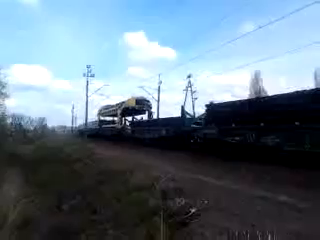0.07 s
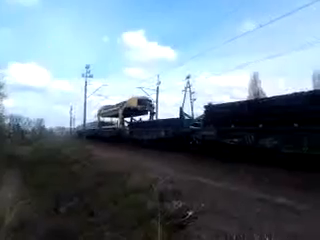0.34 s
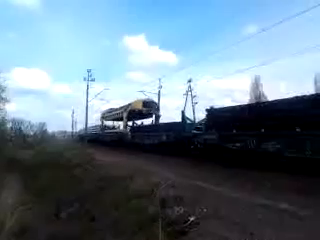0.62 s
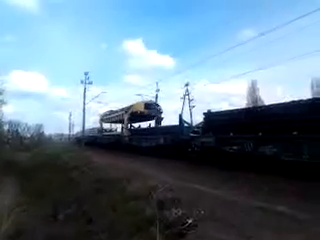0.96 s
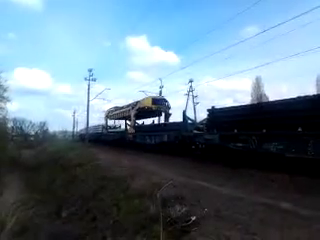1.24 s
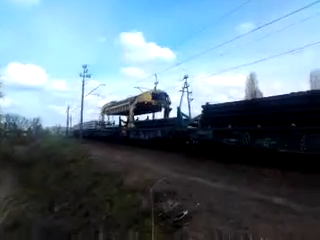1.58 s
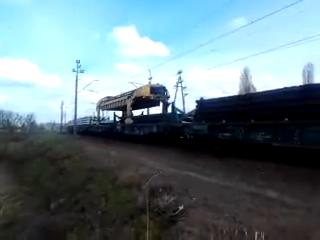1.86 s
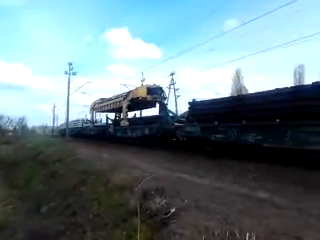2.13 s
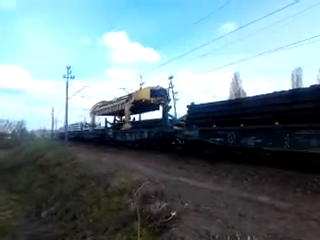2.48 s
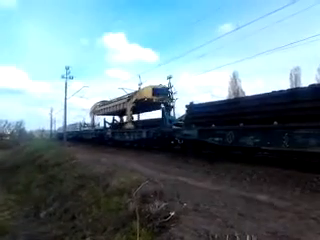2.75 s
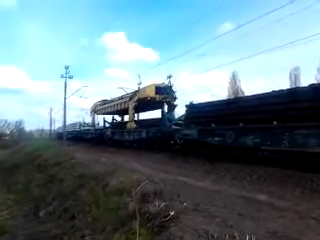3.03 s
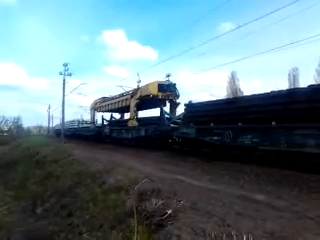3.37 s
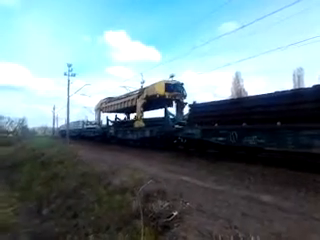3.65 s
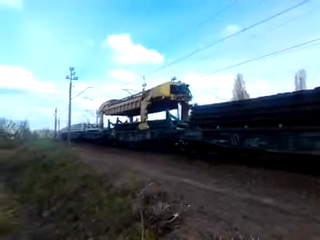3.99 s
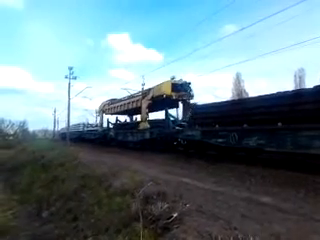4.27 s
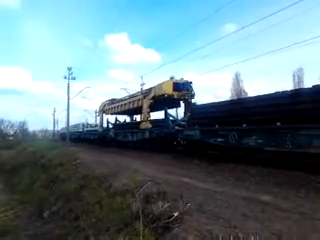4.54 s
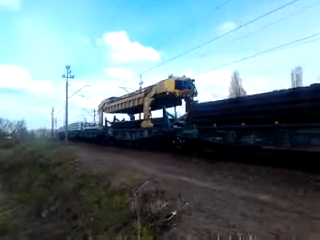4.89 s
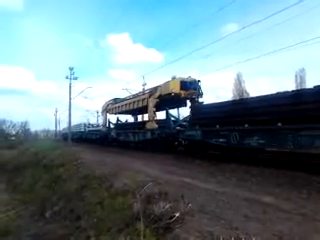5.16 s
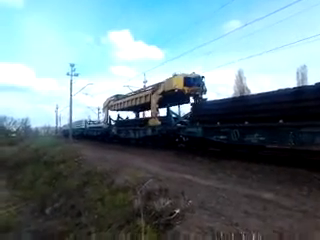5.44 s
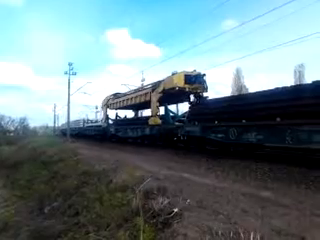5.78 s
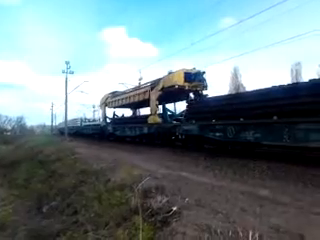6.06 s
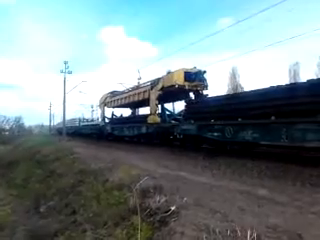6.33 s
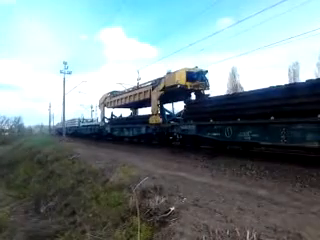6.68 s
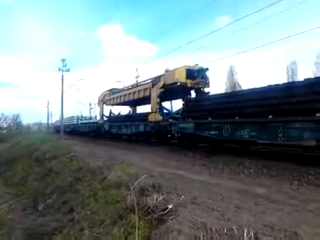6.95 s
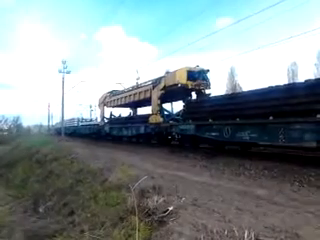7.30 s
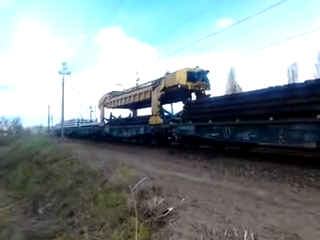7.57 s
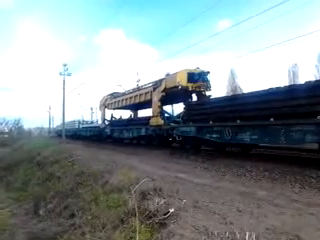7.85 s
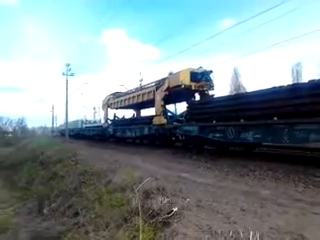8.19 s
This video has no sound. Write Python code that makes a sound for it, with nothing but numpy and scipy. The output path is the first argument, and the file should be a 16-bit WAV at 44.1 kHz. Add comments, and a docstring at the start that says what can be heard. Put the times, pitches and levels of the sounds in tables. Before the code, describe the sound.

After silence, the sound cuts in abruptly at about 0.7 seconds: a track-laying machine working on flat wagons, heard from one microphone beside the line. Its diesel engine drones low and clatters steadily, with wagon rumble, hiss and a wavering hydraulic whine. A knock at the opening leads into a loud, briefly ringing steel clank at 0.9 seconds. From about 1.6 to 3.4 seconds a rough motor whine sinks in pitch. Between 3 and 5 seconds the machine rolls a little closer, growing brighter, with gentle surges of hiss. A gust thumps and buffets the microphone from about 4 to 5 seconds. Soft steel bumps come at 4.8 and 5.7 seconds, then a second loud, sharper clank at 6.7 seconds. The engine and pump run on until the end, at around 8 seconds.

```python
"""Track-laying gantry at the lineside

One microphone beside the line; the gantry works on a train of flat wagons and rolls closer midway.
Its six-cylinder diesel drones and clatters under a whining hydraulic pump, and a motor runs down.
Steel clanks twice, loudly, and bumps softly in between, ringing a wagon. Halfway through, a gust
thumps on the microphone. The sound cuts in abruptly out of silence."""
import sys
import numpy as np
from scipy.fft import rfft, irfft, next_fast_len
from scipy.io import wavfile
from scipy.ndimage import map_coordinates

SR = 44100
rng = np.random.default_rng(int(sys.argv[2]) if len(sys.argv) > 2 else 0)


def transcribe(u):
    """Save the signal u as a 16-bit wav file named by the first command-line argument.

    u: samples, shape (n,) or (channels, n), limited to [-1, 1]; the rate is SR.
    q: integer samples, one column per channel.
    """
    v = np.clip(np.atleast_2d(u).T, -1, 1)
    q = np.round(v * 32767).astype(np.int16)
    wavfile.write(sys.argv[1], SR, q)


N = 362502
TIME = np.arange(N) / SR
START_S, TOP_HZ = 0.687, 14500
CYLINDERS = 6


def amp(db):
    """Decibels to gain."""
    return 10 ** (np.asarray(db) / 20)


def unit(x):
    """Scale to rms 1."""
    return x / np.sqrt(np.mean(x ** 2) + 1e-20)


def curves(rows):
    """One value per sample for each column after the time."""
    times, *columns = np.transpose(rows)
    return [np.interp(TIME, times, column) for column in columns]


def swells(rows, height):
    """A sum of bell-shaped swells, each peaking at height(its dB)."""
    return sum(height(db) * np.exp(-((TIME - at) / half) ** 2) for at, db, half in rows)


def wobble(rate):
    """A smooth random curve, rate knots a second."""
    return map_coordinates(rng.standard_normal(int(N * rate / SR) + 4), [TIME * rate])


def noise():
    """Fresh white noise."""
    return rng.standard_normal(N)


def filtered(x, response):
    """x times a response of frequency."""
    size = next_fast_len(N + 8192)
    return irfft(rfft(x, size) * response(np.fft.rfftfreq(size, 1 / SR)), size)[:N]


def coloured(x, spectrum, tilt_db=0):
    """x shaped by (f/Hz, level/dB) points and a tilt per octave, at rms 1."""
    points_hz, db = np.transpose(spectrum)

    def response(hz):
        shape_db = np.interp(np.log(hz + 1), np.log(points_hz), db, left=-80, right=-80)
        return amp(shape_db + tilt_db * np.log2(hz + 1))
    return unit(filtered(x, response))


def turns(hz):
    """Cycles completed at a changing rate."""
    return np.cumsum(hz) / SR


def tone(cycles, waver_db, smear_rad):
    """A sine of rms near 1 whose level and phase waver in the moving air."""
    phase = 2 * np.pi * (cycles + rng.random()) + smear_rad * wobble(12)
    return np.sqrt(2) * np.sin(phase) * amp(waver_db * wobble(6))


def closing(far, near):
    """Moves from far to near as the gantry rolls up to the microphone, from 2.8 to 5.2 s."""
    return far + (near - far) * np.clip((TIME - 2.8) / 2.4, 0, 1)


def approaching(x, spectra):
    """x shaded from its far colour to its near one."""
    hz, far_db, near_db = np.transpose(spectra)
    return closing(coloured(x, np.c_[hz, far_db]), coloured(x, np.c_[hz, near_db]))


def harmonics(cycles, rows, waver_db, smear_rad):
    """Wavering harmonics, each moving from its far level to its near one."""
    return sum(amp(closing(far_db, near_db)) * tone(round(multiple) * cycles, waver_db, smear_rad)
               for multiple, far_db, near_db in rows)


# Diesel speed: t/s, firing rate f/Hz
ENGINE_SPEED = [(0.7, 108.9), (1.42, 109.4), (1.7, 112.6), (2.15, 110.1), (3.1, 109.0), (4.4, 107.5),
                (5.4, 108.3), (7.4, 108.0), (7.82, 106.0), (8.2, 108.9)]
def engine_cycles():
    """Cycles the diesel has completed; every cylinder fires once in each."""
    firing_hz, = curves(ENGINE_SPEED)
    return turns(firing_hz / CYLINDERS)


# Exhaust drone: t/s, firing tone level/dB, octave level/dB
EXHAUST_LEVELS = [(0.8, -32.5, -40), (1.6, -32.5, -40.1), (1.95, -37, -38.5), (3.75, -30, -45.5),
                  (5.25, -29.5, -42.5), (5.6, -28, -35), (6.7, -32.2, -36.5), (7.45, -31.3, -38),
                  (7.9, -29, -34)]
# Tones of unequal cylinders: multiple of the cycle rate, far level/dB, near level/dB
UNEVEN_TONES = [(5, -56, -49), (7, -56, -52), (9, -44.5, -44), (13, -52, -56), (14, -48, -52),
                (22, -50, -51), (30, -52, -49), (31, -48, -41.5), (33, -52, -51), (36, -51, -47.5)]
def exhaust(cycle):
    """Exhaust pulses drone at the firing rate and its octave; unequal cylinders add weaker tones."""
    firing_db, octave_db = curves(EXHAUST_LEVELS)
    drone = amp(firing_db) * tone(CYLINDERS * cycle, waver_db=1.0, smear_rad=0.042)
    drone += amp(octave_db) * tone(2 * CYLINDERS * cycle, waver_db=0.0, smear_rad=0.083)
    return drone + harmonics(cycle, UNEVEN_TONES, waver_db=1.8, smear_rad=0.094)


def rattle(cycle, repeat, depth):
    """Engine noise pulsing at each firing; the share `repeat` of its power recurs every cycle."""
    size = SR // 18  # samples in about one cycle
    pattern = unit(map_coordinates(rng.standard_normal(size), [cycle % 1 * size], mode="grid-wrap"))
    pulsing = 1 + depth * np.cos(2 * np.pi * CYLINDERS * cycle)
    return pulsing * (np.sqrt(repeat) * pattern + np.sqrt(1 - repeat) * noise())


# Spectra of wagon rumble, air and oil hiss, and the fizz on top: f/Hz, relative level/dB
RUMBLE_SPECTRUM = [(15, -23), (40, -2.5), (70, 1), (150, -1), (220, 0), (300, -7.5), (450, -27)]
HISS_SPECTRUM = [(1800, -34), (2900, -13), (3500, -4.5), (4300, -1.5), (5100, 3.5), (5800, -2), (6300, -9),
                 (7100, -2.5), (7900, -5.5), (8500, -15.5), (10000, -40)]
FIZZ_SPECTRUM = [(8400, -16), (9100, 2.5), (9700, -0.5), (10700, -7.5), (12200, 2.5), (13400, -3),
                 (14500, -13)]
# Spectra of housing roar and injector clatter: f/Hz, relative level/dB far, the same near
ROAR_SPECTRA = [(200, -13, -34), (306, -0.5, -3), (380, -2.5, -3), (450, 1, 3), (545, 2.5, 1),
                (685, -3, -6), (837, -4.5, 0), (985, 0.5, 5.5), (1097, 0.5, 1), (1194, -3, 0),
                (1490, -8, -11.5), (2250, -40, -21)]
CLATTER_SPECTRA = [(704, -5.5, -27), (1200, 2.5, -8.5), (1430, -2.5, 3), (1750, 2, -1), (1940, -0.5, 7.5),
                   (1970, 2, 2.5), (2210, 0, -1), (2360, -0.5, 2.5), (2630, -3.5, -6.5), (2830, -8.5, -14),
                   (4020, -24.5, -32)]
# Surges of air and oil: t/s, rise in hiss level/dB, half length/s
SURGE_SWELLS = [(2.85, 4, .38), (3.55, 1.5, 0.12), (4.5, 2, 0.34), (5.55, 2, 0.19), (6.9, 0.5, 0.26),
                (7.83, 2.5, 0.21)]
def machinery(cycle):
    """Wagons rumble, the housing roars, injectors clatter, air and oil hiss; surges lift the treble."""
    surge_db = swells(SURGE_SWELLS, float)
    opening_db = 5.5 * np.exp(-np.maximum(TIME - START_S, 0) / 0.78)  # starts louder, then settles
    rumble_db = closing(-38, -35.7) + 1.2 * opening_db + wobble(6.5)
    roar_db = closing(-29.5, -28.5) + opening_db + 0.55 * wobble(9)
    clatter_db = closing(-33, -30.5) + 0.77 * opening_db + 0.28 * surge_db + 0.48 * wobble(11)
    hiss_db = closing(-41, -37) + 0.5 * opening_db + surge_db + 0.58 * wobble(5.1)
    fizz_db = closing(-53.5, -48) + 1.6 * surge_db + wobble(30)
    return (amp(rumble_db) * coloured(noise(), RUMBLE_SPECTRUM)
            + amp(roar_db) * approaching(rattle(cycle, repeat=0.19, depth=0.067), ROAR_SPECTRA)
            + amp(clatter_db) * approaching(rattle(cycle, repeat=0.39, depth=0.093), CLATTER_SPECTRA)
            + amp(hiss_db) * coloured(rattle(cycle, repeat=0.16, depth=0.04), HISS_SPECTRUM)
            + amp(fizz_db) * coloured(noise(), FIZZ_SPECTRUM))


# Hydraulic whine: t/s, level/dB
WHINE_LEVELS = [(1.2, -35.6), (1.7, -29), (2.2, -34), (2.75, -28.4), (3.55, -34.5), (4.3, -38),
                (4.95, -34.3), (5.85, -39), (6.35, -32.2), (8.1, -33.5)]
# Harmonics that ring the housing, relative to the whine: multiple, far level/dB, near level/dB
HOUSING_TONES = [(12, -7, -4.2), (13, -4.8, -3.8), (14, -4.5, -10)]
# Weaker pump harmonics: multiple, far level/dB, near level/dB
WEAK_PUMP_TONES = [(6, -48.5, -48), (8, -45, -49.5), (15, -53, -57), (18, -54, -47.5), (24, -48, -48),
                   (30, -56, -49.5)]
def pump(cycle):
    """Piston harmonics geared to the engine; three ring the housing near 1 kHz, rougher close up."""
    whine_db, = curves(WHINE_LEVELS)
    strokes = 0.75 * CYLINDERS * cycle  # three strokes to four firings
    ringing = harmonics(strokes, HOUSING_TONES, waver_db=1.6, smear_rad=closing(0.24, 0.52))
    weak = harmonics(strokes, WEAK_PUMP_TONES, waver_db=3.5, smear_rad=0.71)
    return amp(whine_db) * ringing + weak


def blow(age, rise_s, t60_s):
    """A blow's envelope: exponential rise to age 0, then 60 dB down in t60_s."""
    return np.exp(np.minimum(age, 0) / max(rise_s, 0.001)) * amp(-60 * np.maximum(age, 0) / t60_s)


# Wagon resonances: f/Hz, width/Hz, relative level/dB
WAGON_MODES = [(204, 42, -9), (586, 79, 1.5), (750, 92, 4), (1113, 32, 3), (1710, 71, -2), (1970, 25, -10),
               (2410, 32, -22)]
def wagon_ring(hz):
    """The frequency response of the wagon's ringing steel."""
    return sum(amp(db) * 1j * hz * width / (centre ** 2 - hz ** 2 + 1j * hz * width)
               for centre, width, db in WAGON_MODES)


# Steel blows: t/s, body relative level/dB, rise/s, t60/s, tilt/(dB per octave), crack level/dB
STEEL_BLOWS = [(0.69, -18, 0.0014, 0.39, -2, -31.5), (.915, -12.8, 0.0051, 0.33, -2, -31),
               (0.939, -14.5, 0.0073, 0.46, -0.4, -32), (4.77, -25.5, 0.029, 0.33, -0.5, -47),
               (5.695, -24, .02, 0.33, -1.5, -51), (6.678, -16.5, 0.012, 0.26, 2, -21)]
# Spectra of the struck wagon and of the crack: f/Hz, relative level/dB
WAGON_SPECTRUM = [(60, -31), (180, 0), (350, -3), (520, 0), (800, -5.5), (1100, -1.5), (1600, -4.5),
                  (2300, -3.5), (3200, -16), (4300, -16.5), (5500, -11), (7500, -22), (9000, -29.5),
                  (14000, -41)]
CRACK_SPECTRUM = [(1200, -16), (2500, 1), (4200, -0.5), (6000, -4), (7500, 8), (8200, -4), (9000, -7),
                  (10300, -11), (11500, -17), (14000, -16)]
def clanks():
    """Heavy steel meets steel: a bright crack, then a crowd of small contacts that ring the wagon."""
    body, crack_envelope = np.zeros(N), np.zeros(N)
    for at, db, rise_s, t60_s, tilt_db, crack_db in STEEL_BLOWS:
        age = TIME - at
        contacts = noise() * amp(0.65 * wobble(500))
        body += amp(db) * blow(age, rise_s, t60_s) * coloured(contacts, WAGON_SPECTRUM, tilt_db)
        crack_envelope += amp(crack_db) * blow(age + rise_s, 0.0033, 0.071)  # peaks as the body swells
    crack = crack_envelope * coloured(noise(), CRACK_SPECTRUM)
    return amp(-1.0) * body + amp(-0.5) * filtered(body, wagon_ring) + crack


# Motor partials: multiple of the pitch, level/dB
MOTOR_TONES = [(.25, -41), (1, -36.3), (1.45, -42)]
def motor_rundown(start_s=1.6, end_s=3.42, fade_s=0.3, start_hz=840, sag_hz_per_s=234):
    """A rough whine that sinks steadily as a motor slows."""
    age = np.clip(TIME, start_s, end_s) - start_s
    envelope = np.clip(np.minimum(age, end_s - start_s - age) / fade_s, 0, 1)
    cycles = turns(start_hz - sag_hz_per_s * age + 18 * wobble(90))
    return envelope * sum(amp(db) * tone(multiple * cycles, waver_db=2.5, smear_rad=0.4)
                          for multiple, db in MOTOR_TONES)


# Buffeting at the microphone: f/Hz, relative level/dB
BUFFET_SPECTRUM = [(18, -14), (45, 1), (110, -1), (240, -3), (400, -13.5), (700, -33), (1500, -60)]
# Gusts and single eddies: t/s, peak level/dB, half length/s
GUST_SWELLS = [(1.75, -28, .04), (4.16, -25, .025), (4.3, -19.5, 0.062), (4.45, -27, 0.063),
               (4.65, -21.5, 0.037), (4.77, -30, .035), (4.86, -27.5, .03), (4.96, -27.5, .025),
               (5.28, -32, 0.15), (6.25, -32, .05)]
EDDY_PULSES = [(4.087, -11, 0.00073), (4.093, -13.5, .0013), (4.307, -12, 0.00074), (4.317, -7, 0.0019),
               (4.405, -11.5, 0.00069), (4.476, -13, .002), (4.661, -17, 0.0026), (4.855, -16, 0.0014),
               (4.966, -17, 0.0017)]
def wind(breeze_db=-50):
    """Gusts over a light breeze buffet the microphone; a few eddies each pull once at the diaphragm."""
    buffeting = unit(amp(2.9 * wobble(35)) * coloured(noise(), BUFFET_SPECTRUM))
    pressure = (amp(breeze_db) + swells(GUST_SWELLS, amp)) * buffeting
    for at, db, half in EDDY_PULSES:
        offset = (TIME - at) / half
        pressure -= amp(db) * (1 - offset ** 2) * np.exp(-offset ** 2 / 2)
    return pressure


def scene():
    """Everything that reaches the one microphone beside the line."""
    cycle = engine_cycles()
    return (exhaust(cycle) + machinery(cycle) + pump(cycle) + clanks() + motor_rundown() + wind())[None]


def record(dry):
    """The sound switches on abruptly and keeps nothing above the band limit."""
    return filtered(dry[0] * (TIME > START_S), lambda hz: hz < TOP_HZ)[None]


dry = scene()
out = record(dry)
transcribe(out)
```